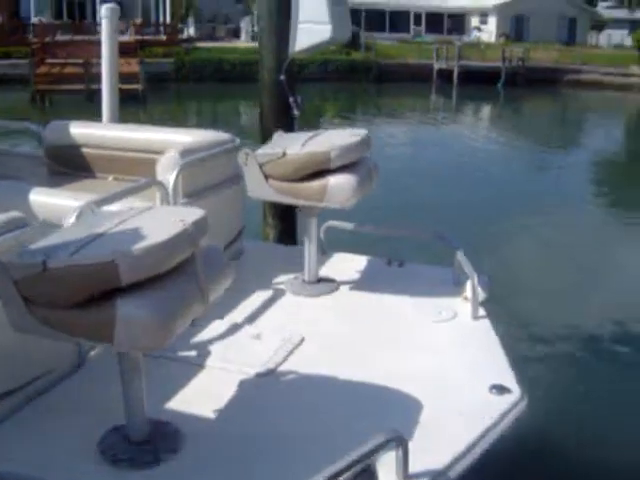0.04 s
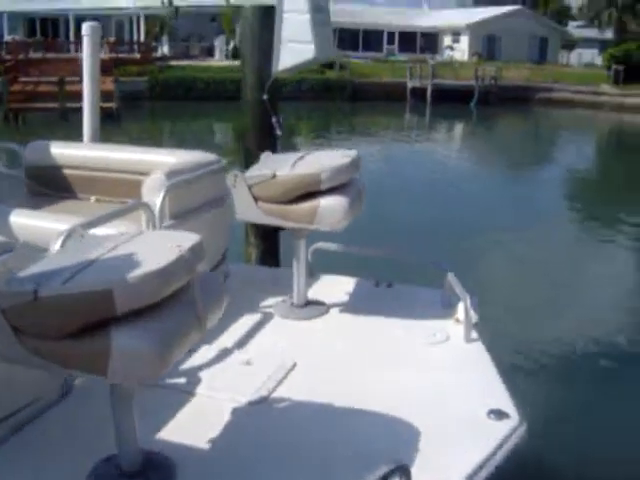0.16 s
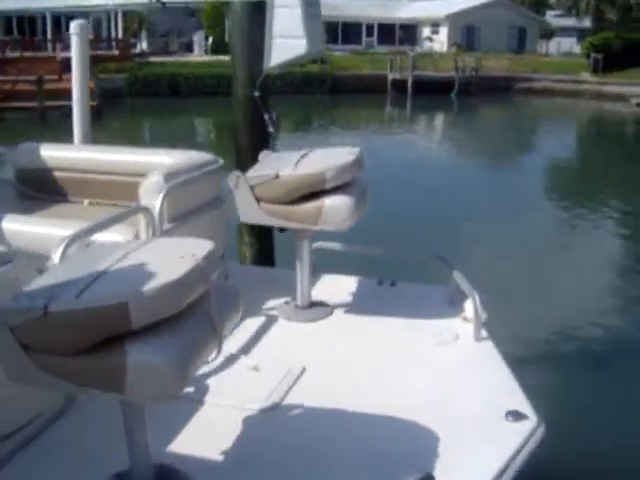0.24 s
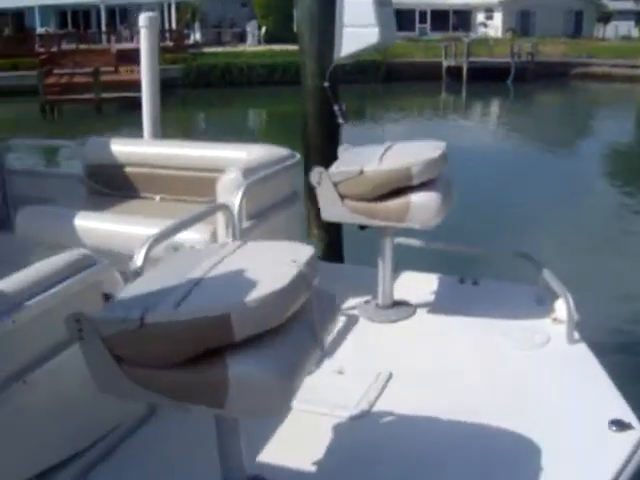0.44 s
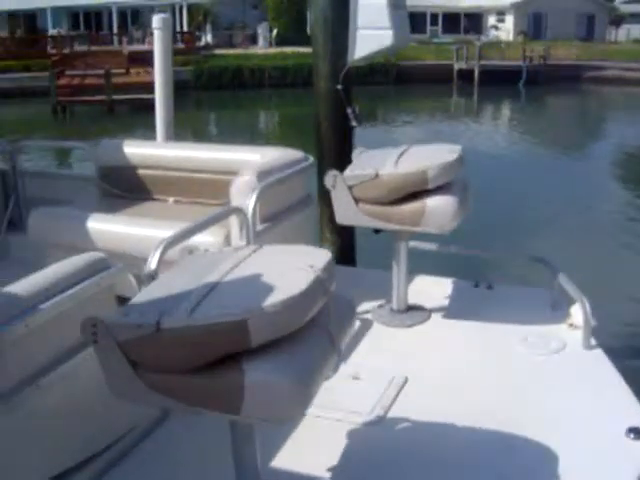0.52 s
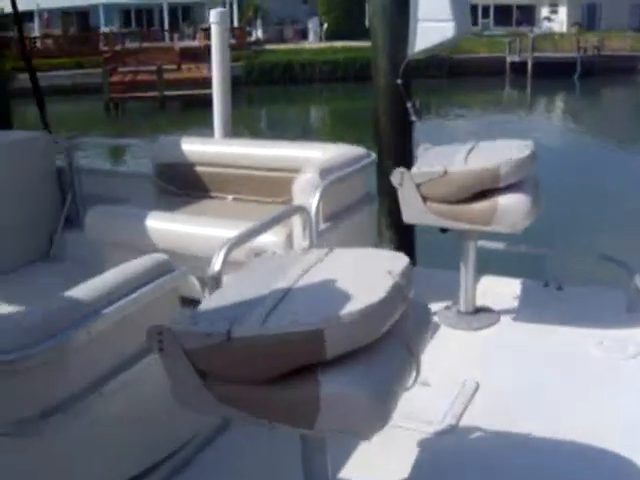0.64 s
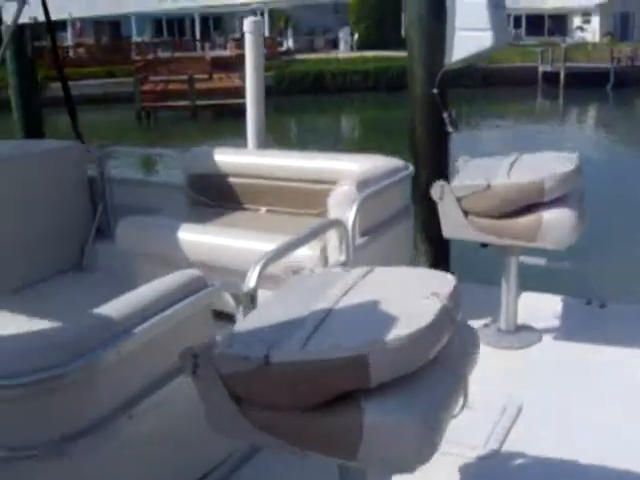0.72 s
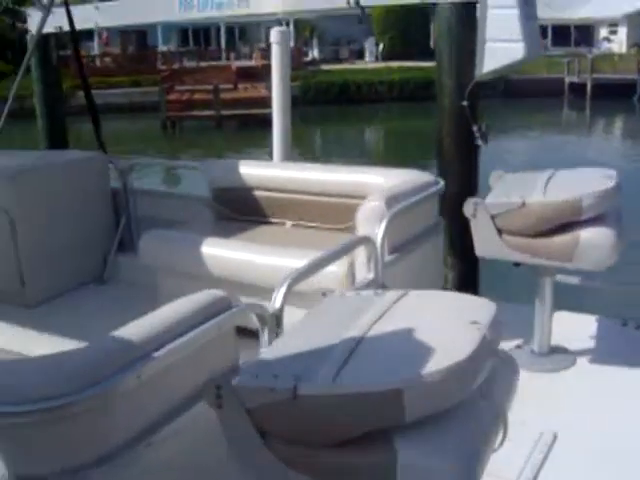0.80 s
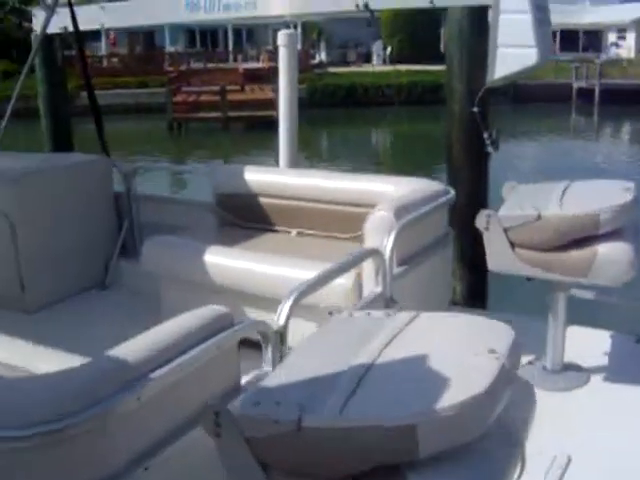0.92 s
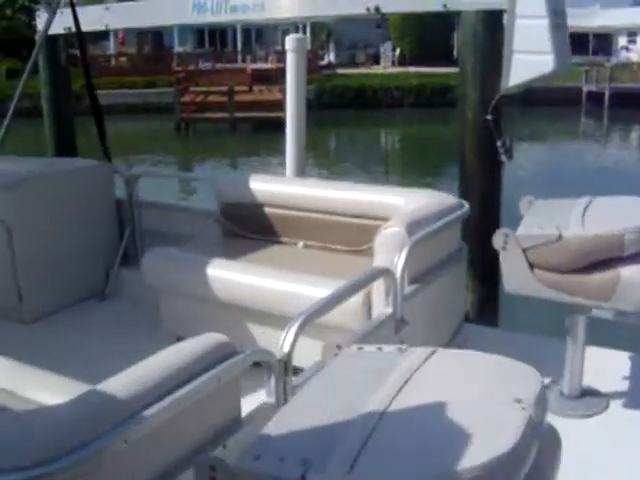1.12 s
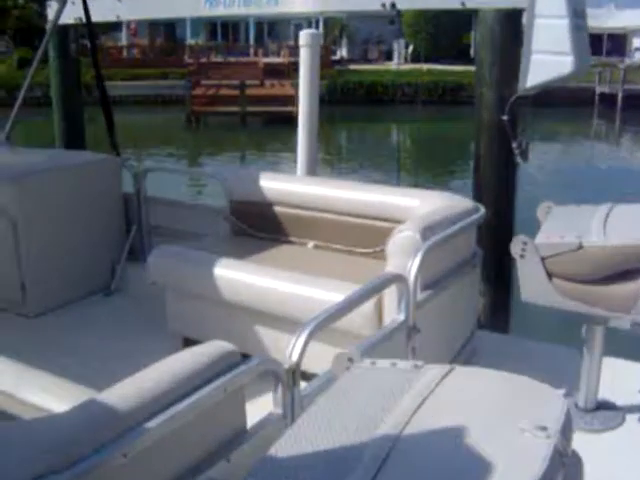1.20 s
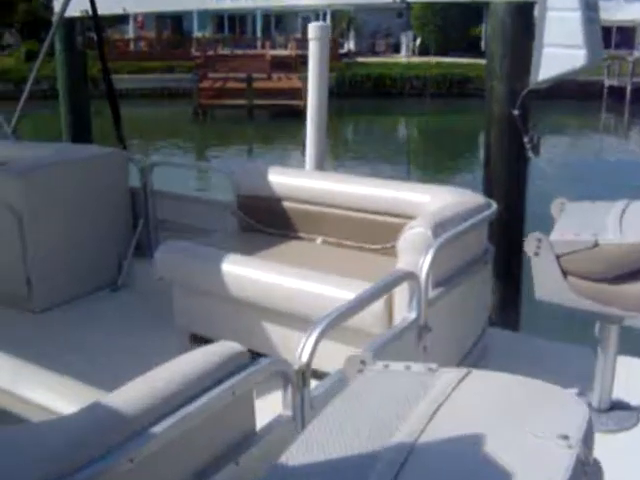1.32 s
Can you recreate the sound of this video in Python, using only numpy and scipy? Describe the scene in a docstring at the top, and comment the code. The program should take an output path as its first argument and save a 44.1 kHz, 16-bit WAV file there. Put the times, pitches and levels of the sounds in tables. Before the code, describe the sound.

One low, hollow footstep thuds on a boat deck nearby, followed by a few tiny ticks and slight microphone bumps. Gentle wind noise continues outdoors over the canal, with a faraway bird repeating faint chirps.

```python
"""A breeze and far shore noise fill the air over a canal, with a low rumble and a hiss that later swells.
A distant bird repeats a two-note whistle, each note a gliding pure tone. After a light toe tap, a heel
thuds and rebounds on the hollow deck of a moored boat, exciting its damped normal modes. Something small
rattles, a hand bumps the camera in low pulses, and short bursts of treble hiss follow the thud."""
import sys
import numpy as np
from scipy import signal
from scipy.fft import rfft, irfft, next_fast_len
from scipy.io import wavfile
from scipy.ndimage import uniform_filter1d, map_coordinates

SR = 44100
rng = np.random.default_rng(int(sys.argv[2]) if len(sys.argv) > 2 else 0)


def to_wav(sig):
    """Store sig (one row per channel, or 1-D mono) as 16-bit WAV at the path in sys.argv[1].

    Samples outside -1..1 are clipped; the rate is SR.
    """
    pcm = np.clip(np.atleast_2d(sig), -1, 1) * 32767
    pcm = np.round(pcm).astype(np.int16)
    wavfile.write(sys.argv[1], SR, pcm.T)  # frames by channels


N = 59535
T = np.arange(N) / SR


def amp(db):
    return 10 ** (np.asarray(db) / 20)


def unit_rms(x):
    return x / np.sqrt(np.mean(x ** 2) + 1e-20)


def filtered(x, response):
    """Linear filtering: the spectrum is multiplied by a frequency response."""
    size = next_fast_len(N + 8192)
    return irfft(rfft(x, size) * response(np.fft.rfftfreq(size, 1 / SR)), size)[..., :N]


def spectrum(points):
    """Spectral envelope: decibels interpolated over log frequency."""
    knot_hz, db = np.transpose(points)
    return lambda hz: amp(np.interp(np.log(hz + 1), np.log(knot_hz + 1), db))


def envelope(rows, column=1):
    """Amplitude envelope: decibels interpolated over time."""
    columns = np.transpose(rows)
    return amp(np.interp(T, columns[0], columns[column]))


def wobble(rate_hz):
    """Random modulation: a spline through Gaussian values."""
    return map_coordinates(rng.standard_normal(size=600), [T * rate_hz], mode="nearest")


def noise(response, patchy_db, flutter_db, flutter_hz):
    """Modulated noise of unit rms: gain varies in time-frequency patches and flutters overall."""
    cells = signal.stft(rng.standard_normal(N + 512), nperseg=512)[2]
    patches = uniform_filter1d(rng.standard_normal(cells.shape), size=4, axis=0)
    patches = unit_rms(uniform_filter1d(patches, size=8, axis=1))
    mottled = signal.istft(cells * amp(patchy_db * patches), nperseg=512)[1][:N]
    return unit_rms(filtered(mottled, response) * amp(flutter_db * wobble(flutter_hz)))


def window(start_s, length_s, edge_s):
    """Tapered window: a plateau with raised-cosine edges."""
    inside_s = np.minimum(T - start_s, start_s + length_s - T)
    return np.sin(np.pi / 2 * np.clip(inside_s / edge_s, 0, 1)) ** 2


# Strength of the ambient noise: time_s, breeze_db, shore_db
AMBIENT_LEVELS = [(0, -48, -53.5), (.07, -48.5, -51.5), (.13, -45, -52.5), (.2, -43, -49), (.4, -46, -54),
                  (.55, -48, -54), (.7, -48, -54.5), (.85, -47, -54.5), (.93, -44.5, -51),
                  (1.05, -45.5, -50.5), (1.15, -47, -51), (1.25, -47, -51.5), (1.35, -46, -52.5)]
# Spectra of the low breeze and the midrange shore noise: frequency_hz, relative_db
BREEZE_SPECTRUM = [(60, -38), (100, -3.5), (145, -1.5), (180, -4), (280, -1), (430, -5), (575, -4.5),
                   (800, -10), (1100, -14.5), (1800, -27), (4000, -87.5)]
SHORE_SPECTRUM = [(400, -36), (800, -8.5), (1020, -1.5), (1300, -6.5), (1700, -5), (2300, -9.5),
                  (3100, -11.5), (4000, -19.5), (6000, -39.5), (10000, -74)]
def breeze_and_shore():
    """Turbulence and far sources add incoherently into broadband noise."""
    breeze = noise(spectrum(BREEZE_SPECTRUM), patchy_db=0.5, flutter_db=1, flutter_hz=25)
    shore = noise(spectrum(SHORE_SPECTRUM), patchy_db=1.5, flutter_db=0.87, flutter_hz=43)
    return envelope(AMBIENT_LEVELS) * breeze + envelope(AMBIENT_LEVELS, column=2) * shore


# Strength of the broad and the narrowband hiss: time_s, level_db
BROAD_HISS_LEVELS = [(0, -56), (.23, -56), (.54, -58), (.8, -59.5), (1.1, -54), (1.35, -54.5)]
NARROW_HISS_LEVELS = [(0, -67), (.35, -65), (.6, -85), (.85, -63), (1, -58), (1.2, -62.5), (1.35, -70)]
# Spectrum of the broad hiss: frequency_hz, relative_db
HISS_SPECTRUM = [(2000, -26), (3500, -4.5), (4500, -2.5), (6000, -4.5), (7500, -7.5), (9000, -8),
                 (10500, -10.5)]
# Peaks of the narrowband hiss: centre_hz, width_hz, relative_db
HISS_PEAKS = [(4400, 250, 0.5), (5770, 180, -7.5), (8350, 590, -9.5)]
def hiss():
    """Broadband treble noise and narrow Gaussian bands superpose, dipping and then swelling."""
    def peaks(hz):
        return sum(amp(db) * np.exp(-((hz - centre) / width) ** 2) for centre, width, db in HISS_PEAKS)
    broad = noise(spectrum(HISS_SPECTRUM), patchy_db=0.95, flutter_db=0.13, flutter_hz=21)
    narrow = noise(peaks, patchy_db=3.0, flutter_db=2.1, flutter_hz=17.93)
    return envelope(BROAD_HISS_LEVELS) * broad + envelope(NARROW_HISS_LEVELS) * narrow


# Strength of the rumble: time_s, level_db
RUMBLE_LEVELS = [(0, -57), (.07, -59), (.12, -54), (.2, -56), (.32, -53), (.43, -57), (.5, -63), (.67, -61),
                 (1.15, -59), (1.35, -60)]
# Spectrum of the rumble: frequency_hz, relative_db
RUMBLE_SPECTRUM = [(12, -21), (30, -11), (60, 1), (100, 1), (150, -10), (300, -59)]
def rumble():
    """Noise band-limited to the bass is heard as an uneven rumble."""
    bass = noise(spectrum(RUMBLE_SPECTRUM), patchy_db=4.0, flutter_db=1.0, flutter_hz=11)
    return envelope(RUMBLE_LEVELS) * bass


# Pitch contour of an arched note: time_from_top_s, pitch_hz
ARCH_CONTOUR = [(-.035, 3000), (-.012, 3200), (0, 3330), (.01, 3250), (0.021, 2980), (0.044, 2680),
                (.065, 2550)]
# Arched notes: top_s, level_db, rise_s, fall_s
ARCHED_NOTES = [(0.111, -62, 0.024, 0.023), (.49, -57, .016, 0.048), (0.839, -55, .033, 0.071),
                (1.219, -54, 0.033, 0.063)]
# Short falling notes: start_s, level_db, length_s, start_pitch_hz
FALLING_NOTES = [(.576, -60, 0.042, 2950), (0.769, -58, 0.025, 2780), (0.949, -57, 0.039, 2900),
                 (1.056, -62, 0.036, 2950), (1.317, -59, 0.051, 2900)]
def bird(fade_db_per_s=50, sag_hz_per_s=6400, edge_s=0.01, echo_t60_s=0.29):
    """Frequency modulation bends a pure tone; convolution with decaying noise adds reverberation."""
    def tone(hz):
        return np.sqrt(2) * np.sin(2 * np.pi * np.cumsum(hz) / SR)
    song = np.zeros(N)
    for top, db, rise, fall in ARCHED_NOTES:
        pitch = np.interp(T - top, *np.transpose(ARCH_CONTOUR))
        gain = amp(db - fade_db_per_s * np.clip(T - top, 0, fall))
        song += gain * window(top - rise, rise + fall, edge_s) * tone(pitch)
    for start, db, length, start_hz in FALLING_NOTES:
        pitch = start_hz - sag_hz_per_s * np.clip(T - start, 0, length)
        song += amp(db) * window(start, length, edge_s) * tone(pitch)
    song *= amp(2.1 * wobble(rate_hz=90))
    echo = rng.standard_normal(N) * amp(-60 * T / echo_t60_s)
    return song + amp(-5.5) * signal.fftconvolve(song, echo / np.linalg.norm(echo))[:N]


# The toe tap, then the ticks of the rattle: start_s, level_db, pitch_hz, t60_s
LIGHT_IMPACTS = [(.0905, -24, 610, .02), (.1476, -38, 1100, .004), (.163, -34, 1300, .004),
                 (.1725, -32, 1150, .004), (.2024, -32, 1100, .004), (.4944, -39, 2000, .005),
                 (.5658, -33, 1700, .004), (.5968, -27, 1500, .004), (.619, -26, 1250, .004),
                 (.6418, -25, 1050, .0045)]
def toe_tap_and_rattle(rise_s=0.00025):
    """Each light impact excites one heavily damped oscillation."""
    start, db, hz, t60 = np.array(LIGHT_IMPACTS).T[:, :, None]
    age = np.clip(T - start, 0, None)
    attack = (1 - np.exp(-age / rise_s)) ** 2
    return (amp(db - 60 * age / t60) * attack * np.sin(2 * np.pi * hz * age)).sum(0)


# Normal modes of the deck: pitch_hz, level_db, base_t60_s, base_rise_s
DECK_MODES = [(91, -13, 0.052, 0.0024), (121.1, -18.5, 0.41, 0.0094), (195.4, -17, 0.068, 0.0034),
              (272.8, 10.5, 0.063, 0.02), (295.7, -14.5, .17, 0.0037), (361, -1, 0.091, 0.025),
              (388.5, 9.5, 0.076, 0.02), (446.8, -12.5, .169, 0.008), (507, 2.36, 0.019, 0.00072),
              (586.6, -31, 0.67, 0.00087), (652.4, -15.9, 0.068, 0.00027), (744, -21, 0.11, .002),
              (807.6, 7, 0.053, 0.028), (1170, -25.5, 0.051, 0.0003), (1504, -23.5, 0.02, 0.0015)]
# Contacts of the foot with the deck: start_s, level_db, hardness_db_per_octave, damping_factor
FOOT_CONTACTS = [(0.0919, -34.5, -5, 1.7), (0.2146, -6.5, 2.5, 0.8), (0.2256, -15, -3, 0.75),
                 (0.2364, -13, 3, 2.5), (0.2461, -23.5, 6.5, .68), (0.2604, -17, 0.1, 1.16),
                 (0.2792, -24.5, -5, 1.29), (0.2938, -27, -2, 1.16)]
def deck(pivot_hz=450):
    """Modal superposition: every contact rings all modes, and harder ones favour the high modes."""
    out = np.zeros(N)
    hz, mode_db, t60, rise = np.array(DECK_MODES).T[:, :, None]
    for start, contact_db, hardness, damping in FOOT_CONTACTS:
        age = np.clip(T - start, 0, None)
        strength = amp(contact_db + mode_db + hardness * np.log2(hz / pivot_hz))
        build_up = (1 - np.exp(-age * damping / rise)) ** 2
        decay = amp(-60 * age * damping / t60)
        out -= (strength * build_up * decay * np.sin(2 * np.pi * hz * age)).sum(0)
    return out


# Pushes of the hand on the camera: start_s, level_db, pitch_hz
HAND_PUSHES = [(.1635, -33, 68), (.347, -34, 96), (.415, -44, 85.5), (.735, -52, 39.8), (1.244, -44, 100)]
def hand_bumps(cycles=1.3):
    """Structure-borne sound: each push arrives as a brief low-frequency pulse."""
    out = np.zeros(N)
    for start, db, hz in HAND_PUSHES:
        length = cycles / hz
        out -= amp(db) * window(start, length, length / 2) * np.sin(2 * np.pi * hz * (T - start))
    return out


# Short bursts of treble hiss: start_s, level_db, length_s
HISS_BURSTS = [(.262, -50, 0.011), (.29, -52.5, .018), (0.769, -50.5, 0.037)]
# Spectrum of the bursts: frequency_hz, relative_db
BURST_SPECTRUM = [(2000, -25), (3000, 6), (4000, 6), (5500, -3), (7500, -7), (10000, -3)]
def hiss_bursts():
    """Amplitude gating cuts treble noise into short bursts, two just after the thud and one later."""
    treble = noise(spectrum(BURST_SPECTRUM), patchy_db=3.0, flutter_db=0.0, flutter_hz=130)
    gate = sum(amp(db) * window(start, length, edge_s=0.004) for start, db, length in HISS_BURSTS)
    return treble * gate


def scene():
    """Linear superposition: the sources add in one channel."""
    background = breeze_and_shore() + hiss() + rumble()
    return (background + bird() + toe_tap_and_rattle() + deck() + hand_bumps() + hiss_bursts())[None]


def record(dry):
    """Band limiting: a steep low-pass filter removes the highest treble."""
    cutoff_hz, taper_hz = 10050, 200
    return filtered(dry, lambda hz: np.clip(0.5 + (cutoff_hz - hz) / taper_hz, 0, 1) ** 2)


dry = scene()
out = record(dry)
to_wav(out)
```